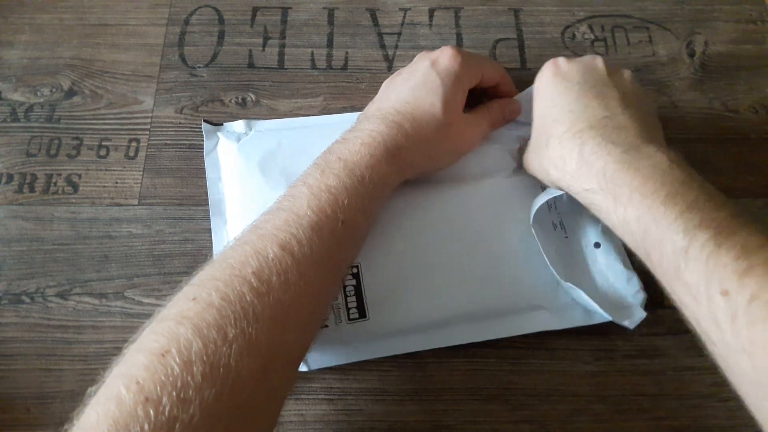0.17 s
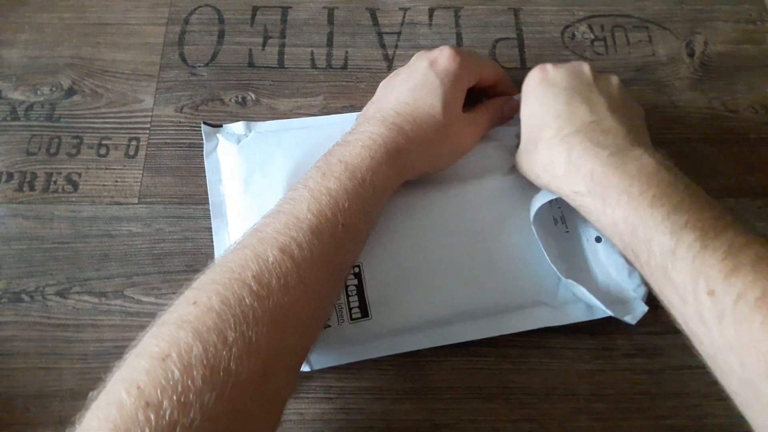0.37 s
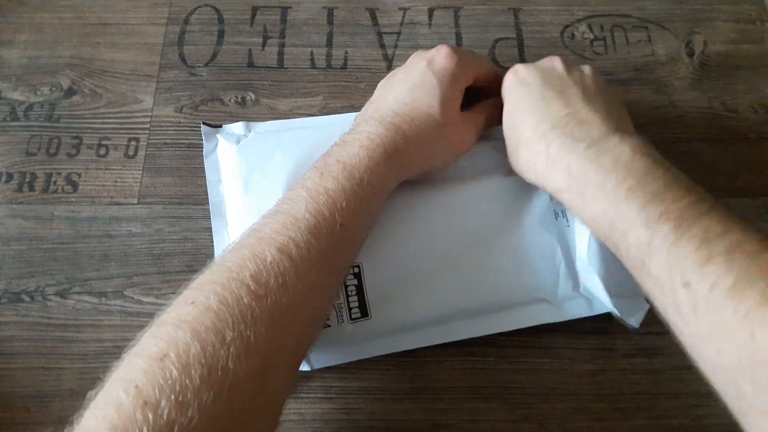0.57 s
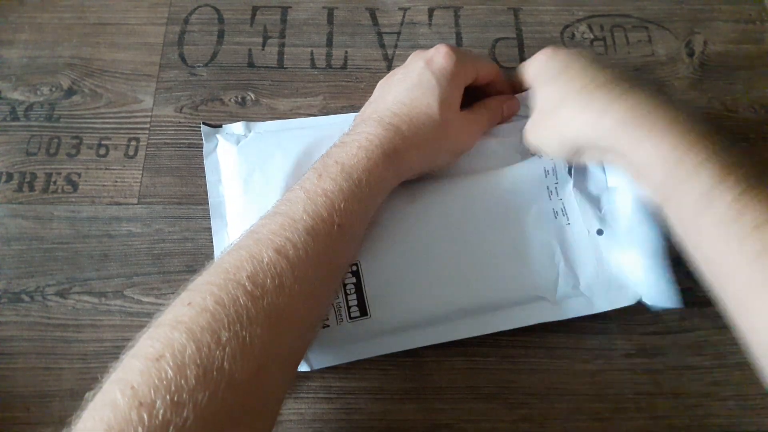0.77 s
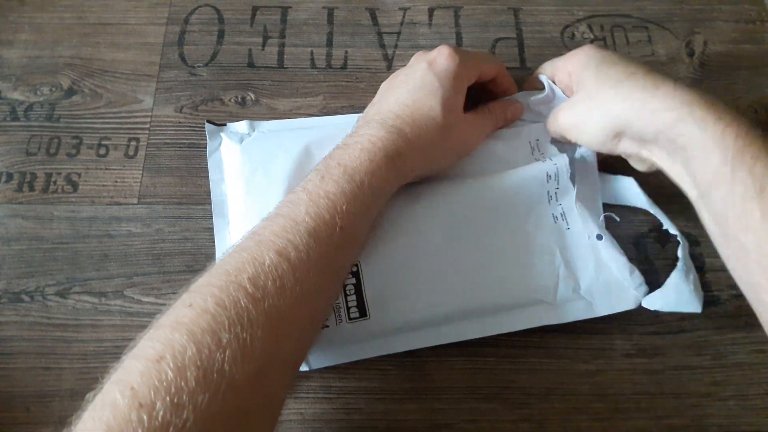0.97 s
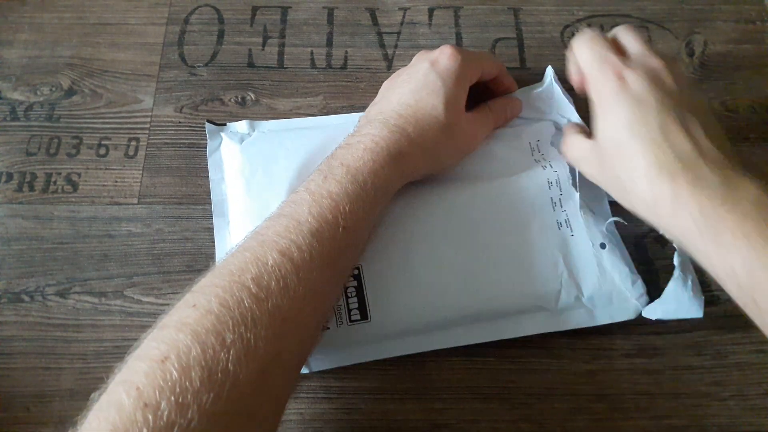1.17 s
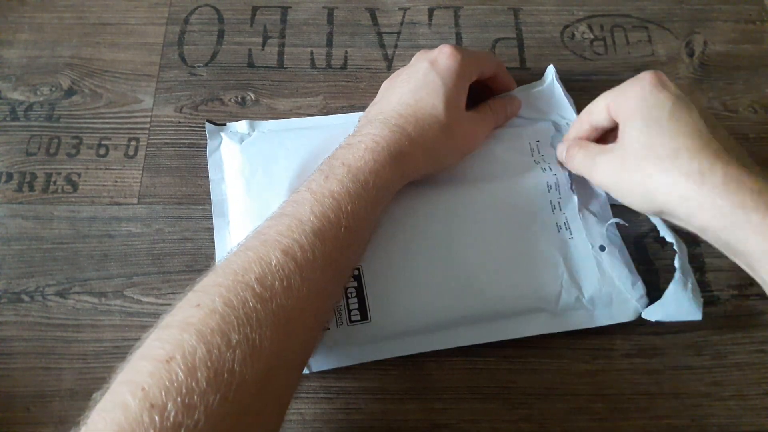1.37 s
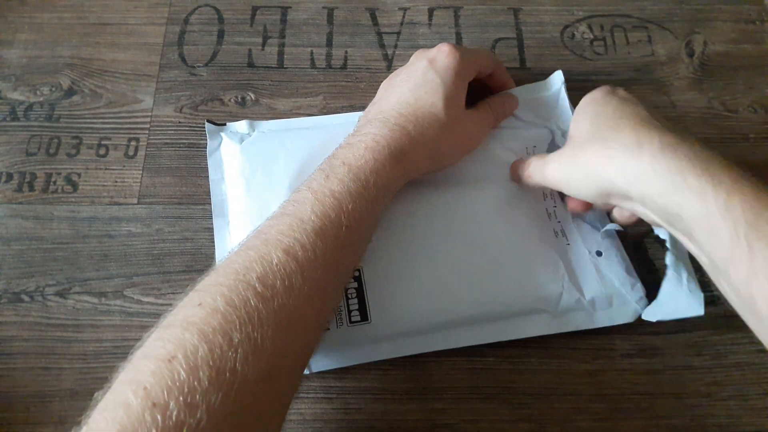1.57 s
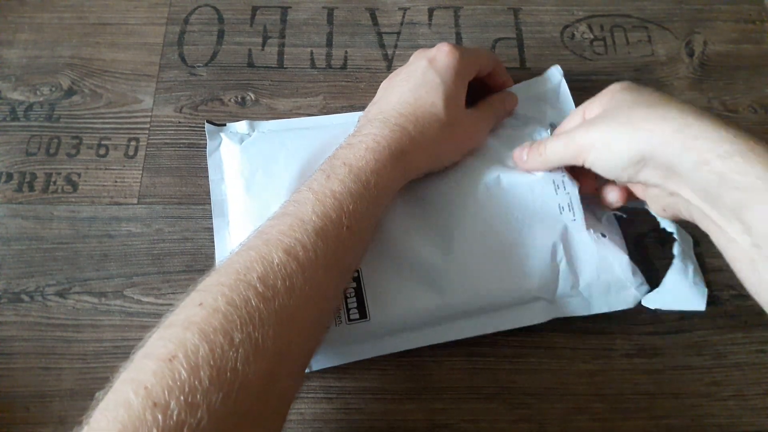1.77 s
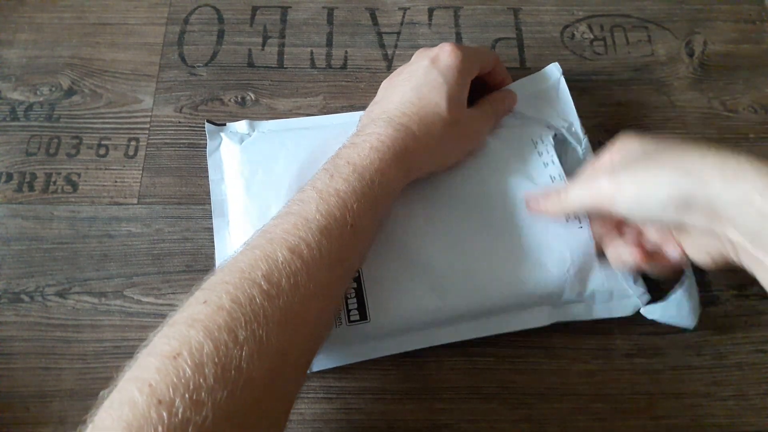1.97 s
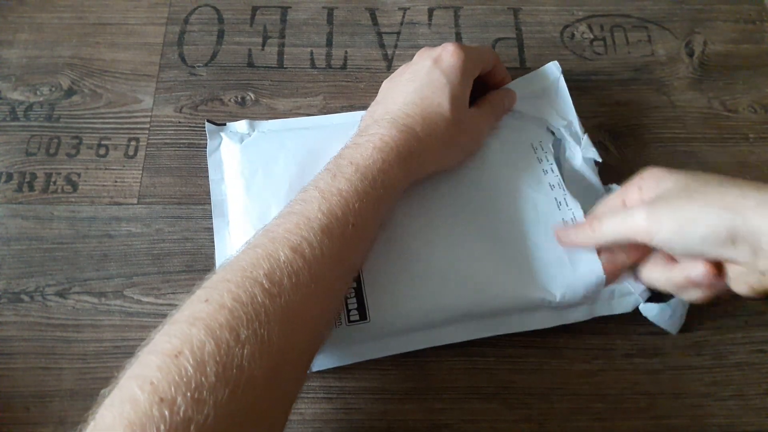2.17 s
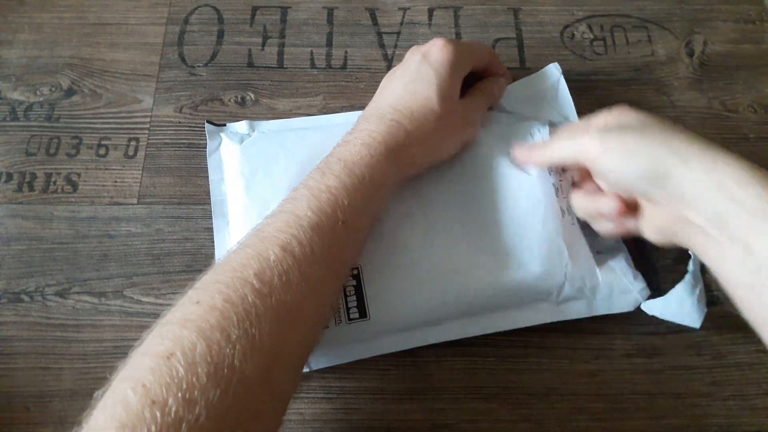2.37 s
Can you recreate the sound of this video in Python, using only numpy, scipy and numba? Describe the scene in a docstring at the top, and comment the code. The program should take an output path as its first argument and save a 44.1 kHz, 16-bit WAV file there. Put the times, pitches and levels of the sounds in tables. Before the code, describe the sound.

A padded paper mailer crackles as hands pull it open on a wooden table: busy snaps at first, a sparser middle, then two much louder bursts. Close stereo microphone, quiet small room.

```python
"""Opening a padded mailer

Hands pull open a padded paper mailer on a wooden table, half a metre below two microphone ports, in a quiet room.
Creases buckle: each snap rings small paper panels for a few cycles (damped sines), with ticks and a dull pouch push.
Dense small crackles and a sliding rustle (shaped noise) follow the effort of the hands.
The room adds a short tail of decaying noise and a faint steady tone of shaped noise."""
import sys
import numpy as np
from scipy import signal
from scipy.fft import rfft, irfft
from scipy.io import wavfile
from scipy.ndimage import uniform_filter1d
from numba import njit

SR = 44100
rng = np.random.default_rng(int(sys.argv[2]) if len(sys.argv) > 2 else 0)


def natural_amplitude(level_db):
    """Convert a level in decibels to a linear amplitude factor, elementwise."""
    exponent = np.asarray(level_db, float) / 20
    return 10 ** exponent


def wrap_up_sound(samples):
    """Save the sound to the file named by the first command line argument, as 16-bit audio."""
    columns = np.atleast_2d(samples).T
    # keep every value between -1 and 1, then stretch to whole-number steps
    tamed = np.clip(columns, -1, 1)
    steps = np.round(tamed * 32767).astype(np.int16)
    wavfile.write(sys.argv[1], SR, steps)


N = 106369  # length [samples]


def curve(points, hz):
    """Points joined by straight lines on a log-frequency axis."""
    p = np.array(points, float)
    return np.interp(np.log(np.maximum(hz, 1)), np.log(p[:, 0]), p[:, 1])


def colour(x, points):
    """Shape the spectrum by (frequency [Hz], gain [dB]) points."""
    n = x.shape[-1]
    hz = np.arange(n // 2 + 1) * SR / n
    return irfft(rfft(x) * natural_amplitude(curve(points, hz)), n)


def unit(x):
    """Scale to an rms of one."""
    return x / np.sqrt(np.mean(x ** 2))


def room_tone():
    """The quiet room: steady shaped noise, independent at the two ports."""
    # spectrum of the quiet room: (frequency [Hz], density [dB per Hz])
    tone_spectrum = [(25, 1), (80, -4), (270, -0.5), (376, -13), (2020, 2), (16000, -23)]
    return unit(colour(rng.standard_normal((2, N)), tone_spectrum)) * natural_amplitude(-59.5)


def room(x):
    """Reverberation: noise decaying in octave bands, differing more between the ports as pitch rises."""
    # reverberation time of the room: (frequency [Hz], time to fall by 60 dB [s])
    decay_times = [(150, 0.17), (550, 0.21), (1500, 0.35), (6000, 0.28), (15000, 0.079)]
    room_db, delay_s = -5, 0.0018
    n = SR // 2
    t, tail = np.arange(n) / SR, 0
    for hz in 90 * 2. ** np.arange(8):
        mid, side = rng.standard_normal((2, n))
        share = min(hz / 1070.0, 1)
        noise = [mid + share * side, mid - share * side]
        sos = signal.butter(2, [hz / np.sqrt(2), hz * np.sqrt(2)], "band", fs=SR, output="sos")
        t60 = curve(decay_times, hz)
        # evens out the energy for decay time and side share
        norm = np.sqrt(t60 * SR / 14 * (1 + share ** 2))
        tail = tail + signal.sosfilt(sos, noise) * natural_amplitude(-60 * t / t60) / norm
    tail = tail * np.clip(t / delay_s - 1, 0, 1)  # silent for one delay, then fades in over another
    return natural_amplitude(room_db) * signal.fftconvolve(x.mean(axis=0)[None], tail)[:, :N]


def effort(column, t):
    """Effort of the hands over time, as the level of one kind of sound."""
    # effort of the hands, before each layer's own trim: (time [s], small crackle and rustle level [dB],
    # their treble level [dB], level of the low rub on the table [dB])
    effort_points = [(0, -33, -75, -48), (0.062, -44, -76, -76), (.09, -28.5, -40.5, -48),
                     (.17, -36.5, -55, -52.5), (.25, -36.5, -54, -47), (.3, -36.5, -50.5, -57),
                     (.4, -43, -60, -50.5), (.48, -51, -77, -43.5), (.6, -43.5, -53, -65),
                     (.66, -35.5, -46.5, -50.5), (.69, -42.5, -55, -49), (0.824, -41, -58, -57.5),
                     (0.869, -29, -60, -44), (.95, -38.5, -52, -61), (1.04, -38, -51, -64),
                     (1.097, -50.5, -69, -70), (1.119, -33.5, -55, -40.5), (1.19, -35, -51, -65),
                     (1.24, -44.5, -55.5, -57.5), (1.355, -53, -59.5, -62), (1.37, -49, -82, -56),
                     (1.44, -40, -48.5, -59), (1.5, -42.5, -64, -61), (1.545, -38.5, -67, -47.5),
                     (1.58, -39, -50, -55), (1.64, -36.5, -50.5, -54.5), (1.75, -34, -44, -54.5),
                     (1.81, -18, -29, -39.5), (1.859, -23, -40, -49), (1.888, -36, -51.5, -63),
                     (2, -35, -46, -51.5), (2.012, -19, -31.5, -40), (2.05, -24.5, -32.5, -48),
                     (2.088, -19.5, -34, -58), (2.16, -33, -38, -52), (2.278, -44, -69, -64),
                     (2.349, -40.5, -54, -53.5), (2.41, -31, -36.5, -46)]
    e = np.array(effort_points, float)
    return np.interp(t, e[:, 0], e[:, column])


def rustle():
    """Skin, paper and table slide: flickering noise, alike at both ports in the bass only."""
    # paper sliding: (frequency [Hz], density [dB per Hz])
    slide_spectrum = [(200, -86), (350, -9.5), (660, -5.5), (1000, -7.5), (2100, 1), (4000, -10),
                      (7000, -22.5)]
    # treble of the sliding: (frequency [Hz], density [dB per Hz])
    treble_spectrum = [(2500, -16), (4500, 12.5), (9000, -23), (13000, 11), (16000, -33)]
    # pouch dragging on wood: (frequency [Hz], density [dB per Hz])
    rub_spectrum = [(40, -39), (90, -10.5), (200, 0), (300, -2), (600, -33)]
    slide_db, treble_db, rub_db = -12, -13, -6.5  # trims on the effort levels
    flicker_db = 3.5  # per unit of flicker
    t, hold, out = np.arange(N) / SR, SR // 120, 0
    # random values held for 1/120 s, then smoothed
    flicker = np.repeat(rng.standard_normal(N // hold + 1), hold)
    flicker = uniform_filter1d(flicker, hold)[:N]
    layers = [(1, slide_spectrum, slide_db), (2, treble_spectrum, treble_db), (3, rub_spectrum, rub_db)]
    for column, shape, trim_db in layers:
        mid, side = unit(colour(rng.standard_normal((2, N)), shape))
        side = colour(side, [(200, -33), (1000, -6), (4000, 2.5)])
        gain = natural_amplitude(effort(column, t) + trim_db + flicker_db * flicker)
        out = out + np.array([mid + side, mid - side]) * gain
    return out


@njit
def rings(n, at, hz, cycles, size, swell):
    """Damped sines, -60 dB after the given cycles, that swell in briefly at fractional sample places."""
    out = np.zeros(n)
    for k in range(len(at)):
        s = (2j * np.pi - np.log(1000.) / cycles[k]) * hz[k] / SR
        i = int(np.ceil(at[k]))
        # one complex turn and decay per sample
        z, turn = size[k] * np.exp(s * (i - at[k])), np.exp(s)
        # the part of the onset still missing
        rate = hz[k] / SR / swell
        missing, shrink = np.exp(-rate * (i - at[k])), np.exp(-rate)
        for j in range(max(i, 0), min(n, i + int(cycles[k] * SR / hz[k]))):
            out[j] += z.imag * (1 - missing)
            z *= turn
            missing *= shrink
    return out


def creases(t, db, hz, overtone_db, tick_db, pouch_db, count):
    """Each buckle gives way in a few quick steps; every step rings panel, overtone, ticks and pouch."""
    step_s, step_fade_db, tick_fade_db = 0.0010015, 5, 2.5  # per step; the ticks fade by both
    panel_cycles, pouch_cycles, tick_cycles, swell_cycles = 5.5, 3., 16., .3
    panel_oct, overtone_oct, pouch_oct = 0.45, .2, 0.29  # pitch scatter [octaves]
    overtone_ratio, pouch_hz, tick_lo_hz, tick_hi_hz = 1.815, 490, 5000, 15600
    lag_samples, lag_spread, pan_spread_db = 0.8, 1, 5.5  # left port against right
    c, u = rng.standard_normal((len(t), count, 6)), rng.random((len(t), count, 4))
    later = np.arange(count) > 0
    step = (np.arange(count) + u[..., 0] - .5) * later  # the first step is on time, the rest jittered
    at = (t[:, None] + step_s * step) * SR
    size = natural_amplitude(db[:, None] - step_fade_db * step) * np.sign(c[..., 0])

    # later steps stray further from the panel's pitch
    stray = np.minimum(step / 2 + .1, 1)
    panel_hz = hz[:, None] * 2 ** (panel_oct * c[..., 1] * stray)
    overtone_hz = np.clip(overtone_ratio * panel_hz, 2000, 5000) * 2 ** (overtone_oct * c[..., 5])
    # three ticks, one in each third of the treble range
    tick_hz = tick_lo_hz * (tick_hi_hz / tick_lo_hz) ** ((np.arange(3) + u[..., 1:]) / 3)
    tick_size = size * natural_amplitude(tick_db[:, None] - tick_fade_db * step)
    parts = [(panel_hz, panel_cycles * np.sqrt(panel_hz / 1500), size),
             (overtone_hz, panel_cycles, size * natural_amplitude(overtone_db)[:, None]),
             (pouch_hz * 2 ** (pouch_oct * c[..., 2]), pouch_cycles, size * natural_amplitude(pouch_db)[:, None])]
    parts += [(tick_hz[..., k], tick_cycles, tick_size) for k in range(3)]

    lag = lag_samples + lag_spread * c[..., 3]
    pan = natural_amplitude(pan_spread_db * c[..., 4] / 2)
    ports = []
    for delay, gain in ((lag, pan), (0, 1 / pan)):
        port = np.zeros(N)
        for f, cycles, a in parts:
            port += rings(N, (at + delay).ravel(), np.clip(f, 60, 17000).ravel(),
                          (cycles + 0 * f).ravel(), (gain * a).ravel(), swell_cycles)
        ports.append(port)
    return np.array(ports)


def crackle(count=1700):
    """Many small buckles at random moments, as strong as the hands work."""
    trim_db, scatter_db = -2, 4.0
    pitch_hz, pitch_oct, pouch_db, overtone_db = 1600, 0.59, -16, -2
    u, c = rng.random((count, 2)).T, rng.standard_normal((count, 4)).T
    t = u[0] * N / SR
    # most are faint, a few stand out
    db = effort(1, t) + trim_db - scatter_db * np.log(1 - .97 * u[1])
    tick_db = effort(2, t) - effort(1, t) + 3 * c[1]
    return creases(t, db, pitch_hz * 2 ** (pitch_oct * c[0]), overtone_db + 4 * c[3], tick_db,
                   pouch_db + 4 * c[2], count=2)


def snaps():
    """The loud single buckles, each a run of five steps."""
    # loud buckles: (time [s], level [dB], central panel pitch [Hz], overtone level [dB],
    # tick level [dB], pouch level [dB]); the last three are relative to the snap's level
    snap_list = [(0.0143, -21, 840, -20, -28, -26), (0.0696, -12.5, 4000, 0.5, -20, -40),
                 (0.0804, -19, 1400, -16, -29, -20), (.085, -11, 1660, -8, -19, -40),
                 (.0942, -13, 1540, 1, -32, -12), (0.1129, -19, 1380, 0, -25, -15),
                 (0.1254, -13.5, 2000, 5, -28, -12), (.1281, -19.5, 590, -12, -28, -4),
                 (0.149, -16.5, 1310, -4, -27, -5.5), (.155, -21.5, 1900, 3, -29, -23),
                 (.1729, -24, 1850, -18, -29, -21), (.1907, -15.5, 780, -30, -41, -10),
                 (0.2015, -25, 1500, -8, -24, -31), (0.2118, -20, 1860, -6, -15, -32),
                 (.224, -22, 1570, -3, -7.5, -24), (0.2577, -14, 1410, -2, -13, -9),
                 (0.269, -12, 2320, 7.5, -8, -24), (0.2809, -14, 920, -14, -23, -18),
                 (.306, -29, 1000, -10, -26, -30), (0.3506, -21, 910, -14, -28, -25),
                 (0.368, -16, 2040, -3.5, -37, -7), (0.4112, -22.5, 756, -16, -35, -4.5),
                 (0.4351, -11.5, 2300, -6, -28, -16.5), (0.5103, -14, 760, 1, -45, -10),
                 (0.539, -33, 2200, -7, 1, -30), (0.565, -28, 2260, 6.5, -16, -12),
                 (0.656, -22, 1520, -6, -19, -30), (.6675, -23, 800, 0.5, -25, -20),
                 (.685, -16, 1820, -26, -32, -5), (.722, -33, 603, -7, 0.5, -25),
                 (0.7414, -11.5, 1890, -0.5, -15, -6), (0.8519, -15.5, 1560, -1, -27, -26),
                 (.87, -9, 1560, -1.5, -11, -22), (.9064, -11, 1890, 0.5, -12, -34),
                 (0.9107, -11.5, 2180, -9, -30, -38), (.9257, -18, 1740, -1, -31, -38),
                 (0.9456, -20, 1700, 8, -11, -26), (0.957, -15, 2640, -9, -10.5, -33),
                 (0.9991, -19.5, 1400, 0, -30, -27), (1.0144, -15.5, 2120, -28, -15, -34),
                 (1.1088, -21, 1290, -13, -23, -30), (1.1184, -23, 1320, -19, -4, -6),
                 (1.1479, -17.5, 1380, -13, -30, -37), (1.1676, -30.5, 1720, -14, 0, -30),
                 (1.1951, -16, 1770, -25, -38, -27), (1.364, -30, 1240, 4, -32, 3),
                 (1.536, -19.5, 2340, -0.5, -28, 1), (1.5424, -21.5, 2670, -12, -32, -1),
                 (1.5577, -22, 1800, 2.5, -36, -3), (1.6011, -16, 1940, 3, -25, -4),
                 (1.6123, -18, 1830, 0.5, -28, -16), (1.6165, -21, 1670, 3.5, -23, 1.5),
                 (1.628, -31, 1900, -3, -31, -10), (1.7305, -16, 2300, -5, -8, -14),
                 (1.7327, -13, 2100, -8, -7, -17), (1.765, -14, 1890, 3, -6, -20),
                 (1.7752, -14.5, 1600, 6.5, -7.5, -27), (1.7877, -10.5, 2340, 1, -13, -25),
                 (1.7972, -15, 1290, -11, -19, -36), (1.8121, -15, 1960, 5, -27, -21),
                 (1.8213, -2.5, 1950, -6, -30, -33), (1.8289, -4, 1330, -14, -18, -30),
                 (1.8495, -15, 2000, -29, -35, -26), (1.8639, -14.5, 2010, 1, -11, -32),
                 (1.981, -21.5, 1000, -2, -29, -30), (2.0068, -3, 1700, -30, -45, -28),
                 (2.012, -2.5, 1770, 0, -42, -13), (2.0164, -7, 1620, 1.5, -35, -12),
                 (2.0298, -0.5, 1820, -20, -17, -18), (2.0719, -10, 1490, -19, -28, -27),
                 (2.0832, -4.5, 1900, -15, -13, -30), (2.1019, -5.5, 1700, -20, -22, -2),
                 (2.1149, -10, 1550, -22, -21, -20), (2.1309, -8, 1830, -18, -13, -11),
                 (2.327, -25, 556, -16, -27, -3.5), (2.3637, -15.5, 1420, -25, -28, -25),
                 (2.3876, -10, 1490, 3.5, -17, -23)]
    rise_s = .0004  # from start to peak
    t, db, *colours = np.array(snap_list, float).T
    return creases(t - rise_s, db, *colours, count=5)


def scene():
    """Buckling and sliding paper, its room tail and the room tone."""
    # a small sheet radiates no bass
    bass_cut = signal.butter(3, 416, "high", fs=SR, output="sos")
    paper = signal.sosfilt(bass_cut, snaps() + crackle()) + rustle()
    return paper + room(paper) + room_tone()


def band_limit(x):
    """A steep low-pass at the top of the band."""
    return signal.sosfilt(signal.butter(12, 16980, fs=SR, output="sos"), x)


def record(dry):
    """The two microphone ports colour the sound differently and the top is cut."""
    # difference of the two ports: (frequency [Hz], left over right [dB])
    port_difference = [(60, -2.5), (300, -2), (700, -0.7), (1300, -3.5), (2400, -0.2), (4400, -2.5),
                       (6000, -3), (8100, 10.5), (10500, 4.5), (15000, 5.5)]
    top_hz = 15700
    half = np.array(port_difference, float) * [1, .5]  # half the difference to each port
    mix = np.array([colour(dry[0], half), colour(dry[1], half * [1, -1])])
    mix = colour(mix, [(top_hz, 0), (top_hz + 150, -30)])
    return band_limit(mix)


dry = scene()
out = record(dry)
wrap_up_sound(out)
```